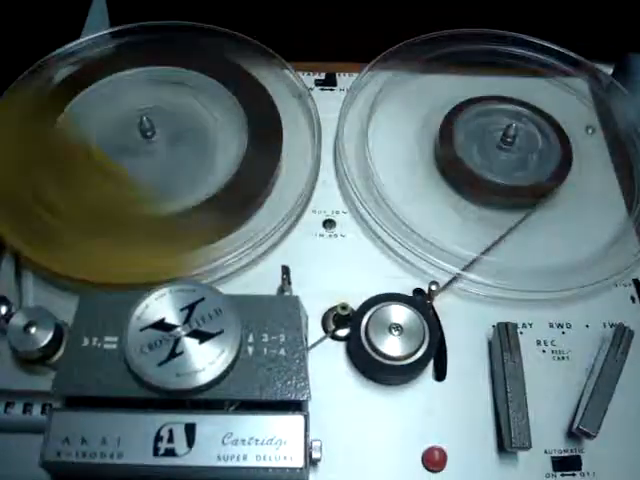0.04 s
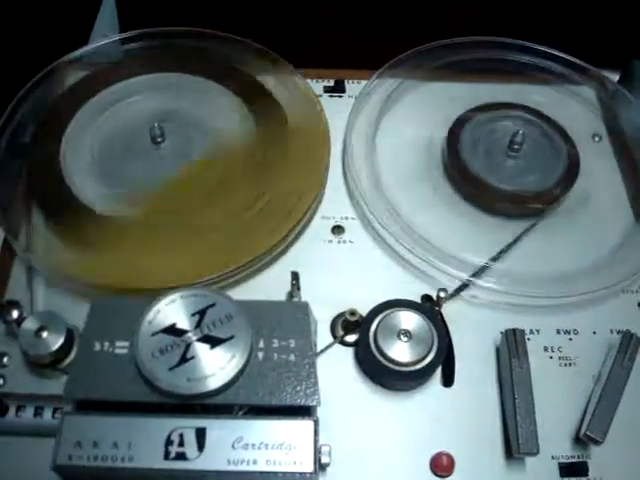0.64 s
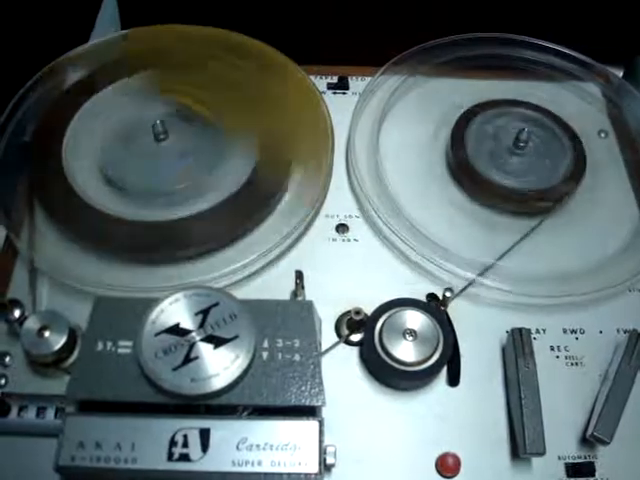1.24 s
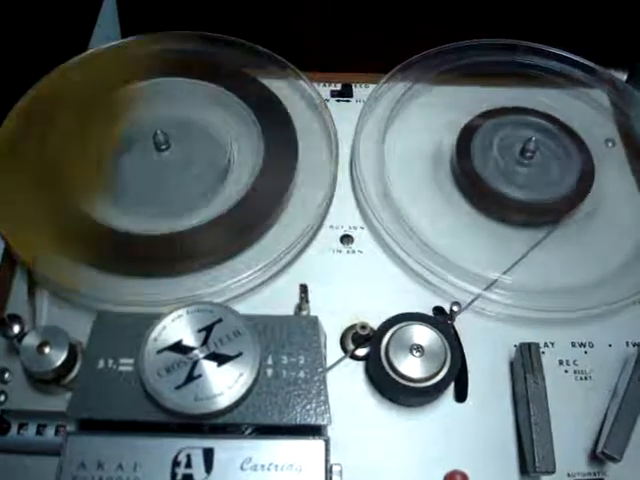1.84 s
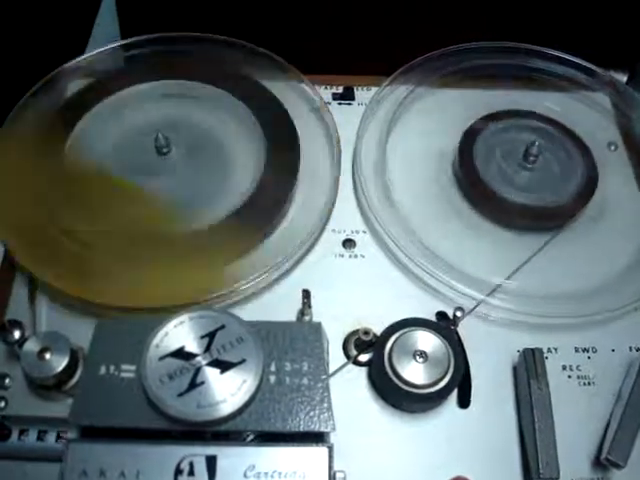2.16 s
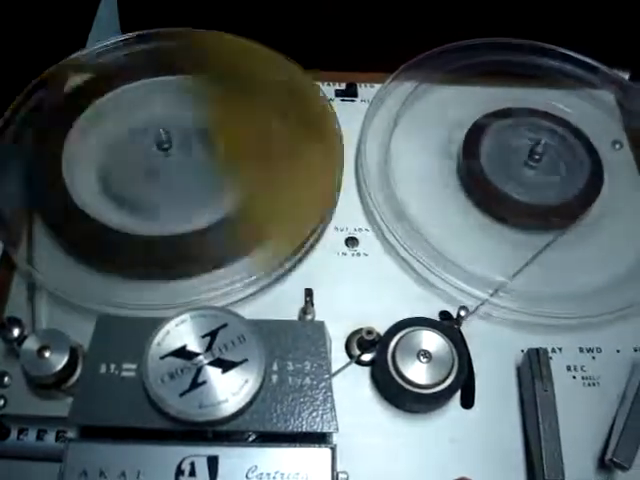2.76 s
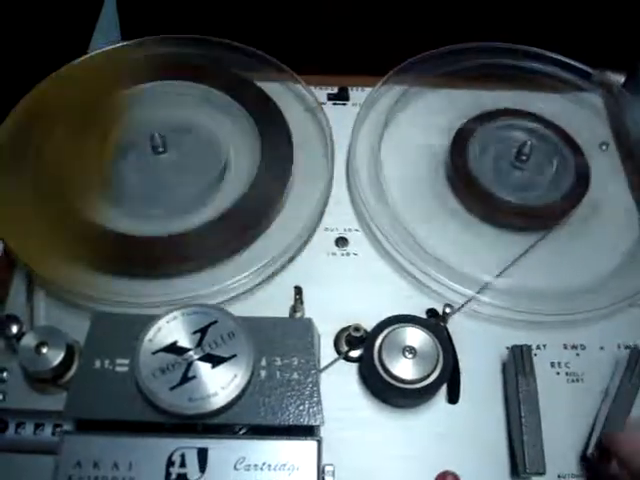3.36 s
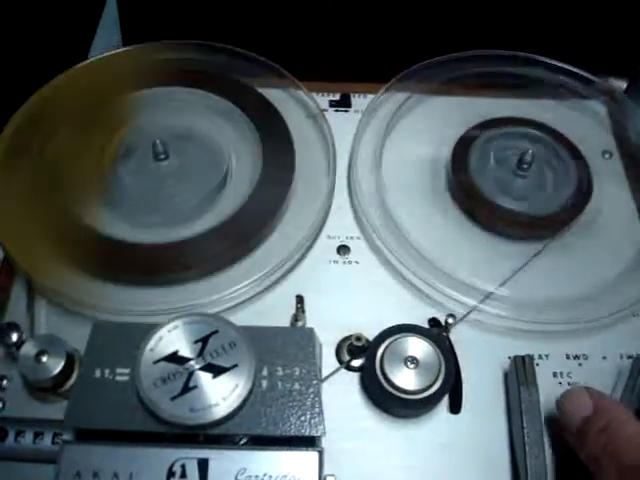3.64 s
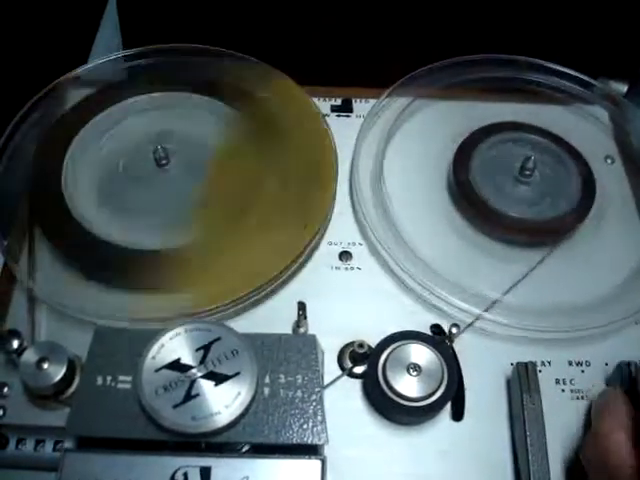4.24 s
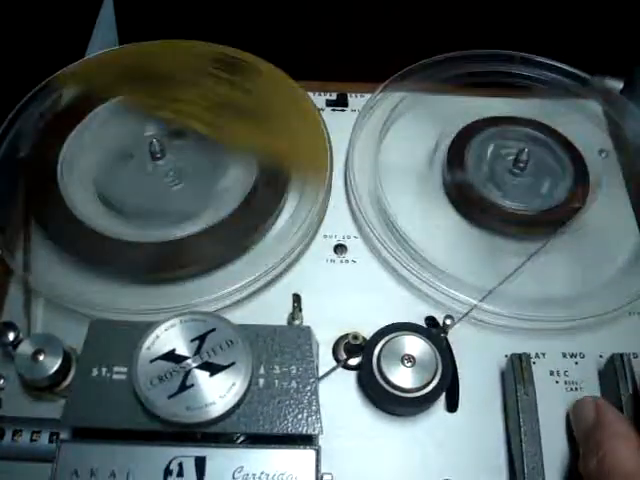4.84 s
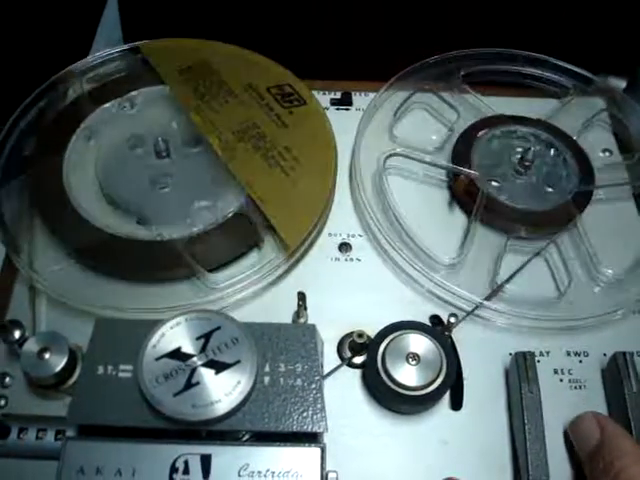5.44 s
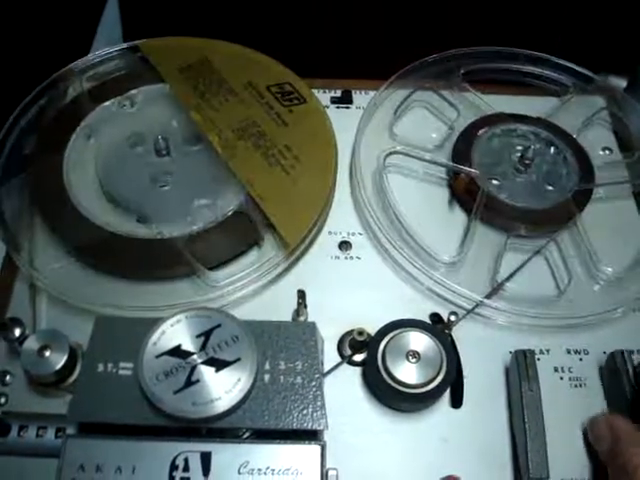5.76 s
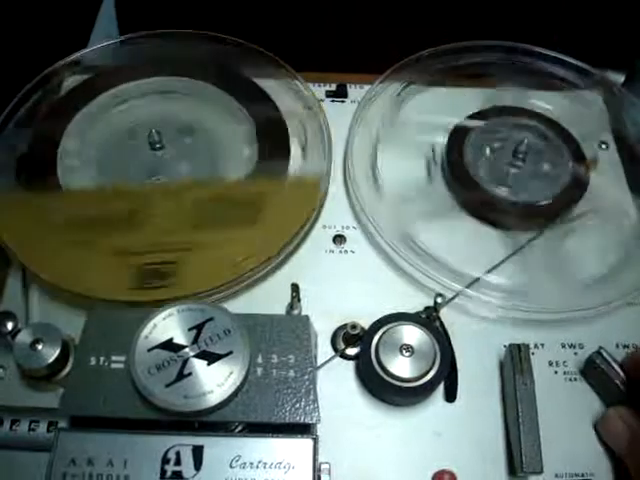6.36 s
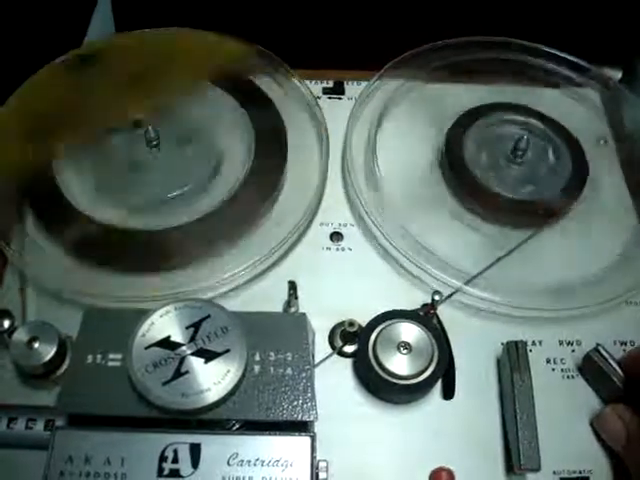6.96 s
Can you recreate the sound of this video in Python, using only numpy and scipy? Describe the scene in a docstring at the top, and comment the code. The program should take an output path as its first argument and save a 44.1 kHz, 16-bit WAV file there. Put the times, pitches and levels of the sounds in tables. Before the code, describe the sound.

A reel-to-reel tape deck is heard up close, winding fast from the start. Its motor hums steadily under a dense whir and a light tape hiss, and a rubbing reel gives short, high squeaks at uneven intervals. At about 4.3 seconds a lever makes a sharp metallic clunk. The hiss fades and the reels slow with a fluttering whine that falls in pitch, joined from about 4.7 to 5.5 seconds by scraping, short chirps and a few light knocks. The reels come to rest around 5.5 seconds, with a few more squeaks just after, while the motor keeps humming and whirring. The lever clunks again at about 5.9 and 6.1 seconds. The hum dips as the reels start up with a rough, rising growl and whine, with small knocks, chirps and a brush of tape, still gathering speed at 7 seconds.

```python
"""Tape deck winding, stopping and restarting

A reel-to-reel deck winds fast: its motor hums, the drive whirs, tape hisses and a rubbing reel squeaks.
A lever clunks, and friction runs the reels down with a falling, rattling whine as the motor keeps going.
The lever clunks again; the motor takes up the load and the reels growl back up towards full speed."""
import sys
import numpy as np
from scipy import signal
from scipy.fft import rfft, irfft, next_fast_len
from scipy.io import wavfile

SR = 44100
rng = np.random.default_rng(int(sys.argv[2]) if len(sys.argv) > 2 else 0)


def unload_audio(sound):
    """Save the sound as a 16-bit wav file, at the path given as the first command line argument."""
    columns = np.transpose(np.atleast_2d(sound))
    # keep every value between -1 and 1, then stretch to whole-number steps
    steps = np.round(np.clip(columns, -1, 1) * 32767)
    wavfile.write(sys.argv[1], SR, steps.astype(np.int16))


N = 308259
TIME = np.arange(N) / SR
RELEASE_S, ENGAGE_S = 4.36, 6.08  # the lever frees the drive, then engages it again
MAINS_HZ, FULL_WHINE_HZ = 59.9, 3135


def reel_speed(friction_hz_per_s=2330, drag_per_s=0.245, spin_up_s=1.97):
    """Share of full speed: steady, slowed to rest by dry friction and drag, then pulled up again."""
    friction = friction_hz_per_s / drag_per_s / FULL_WHINE_HZ
    slowing = (1 + friction) * np.exp(-drag_per_s * np.maximum(TIME - RELEASE_S, 0)) - friction
    rising = 1 - np.exp(-np.maximum(TIME - ENGAGE_S, 0) / spin_up_s)
    return np.maximum(slowing, 0) + rising


# Resonances of the reels and their mounts: centre_hz, width_hz, lift_db
REEL_MODES = [(285, 100, 5.5), (520, 110, 4), (590, 80, 4.5), (1125, 90, 5), (1314, 60, 4), (1540, 90, 4),
              (1925, 90, 6.5), (2080, 110, 7.5), (2238, 74, 17.5), (2345, 32, 8.5), (2385, 28, 7.5),
              (2450, 84, 18.5), (2650, 85, 9.5), (3480, 160, 9), (3740, 170, 18.5), (4080, 110, 7),
              (4232, 90, 16), (4462, 90, 12), (4720, 90, 10), (5010, 190, 14), (5850, 400, -5),
              (7060, 200, 10.5), (7400, 420, 16), (7950, 260, 12.5), (8850, 160, 11), (9750, 600, 14)]
def flare(hz):
    """Gain along a pitch curve: a partial flares as it glides through each reel resonance."""
    lift_db = sum(db / (1 + (2 * (hz - centre) / width) ** 4) for centre, width, db in REEL_MODES)
    return gain_of(lift_db)


# Partials of the reels' whine: harmonic, level_db
WHINE_PARTIALS = [(1, -37.5), (2, -46), (3, -54.5), (4, -60.5), (5, -64)]
def reel_whine(speed, driven, flutter=0.0066, driven_db=-5, driven_overtones_db=-12, dulling_db=-5):
    """The whine follows the speed; slow reels rasp, and driven reels sing less than braked ones."""
    pitch, size = FULL_WHINE_HZ * speed, len(speed)
    hz = pitch * (1 + flutter * wander(size, 109.5))
    slow = np.interp(hz, [850, 1700], [1, 0])
    rough = 0.3 + 0.4 * slow
    whine = np.zeros(size)
    for k, db in WHINE_PARTIALS:
        drive_db, slow_db = (driven_db, -4.5) if k == 1 else (driven_overtones_db, -3)
        level = gain_of(db + driven * drive_db + slow * slow_db)
        level *= gain_of(dulling_db * (k - 1) * (1 - speed))  # overtones fade as the reels slow
        level *= gain_of(np.minimum(4 * wander(size, 80), 2))  # each partial breaks off for moments
        whine += level * flare(k * pitch) * rough_tone(k * hz, rough, width_hz=120 * np.sqrt(k))
    slips = gain_of(-38.5 + driven * driven_db + 2 * wander(size, 70))  # uneven slips smear the whine
    rasp = slow * slips * rough_tone(hz, rough=0.99, width_hz=200)
    return whine + flare(pitch) * rasp, hz


def reels(speed, growl_db=-40, bite_s=0.17):
    """From the release on, the reels whine and chatter, with a growl two octaves below."""
    released = TIME >= RELEASE_S
    pitch, driven = FULL_WHINE_HZ * speed[released], TIME[released] > ENGAGE_S
    whine, fluttering_hz = reel_whine(speed[released], driven)
    growl = flare(pitch / 4) * rough_tone(fluttering_hz / 4, rough=0.27, width_hz=55)
    growl *= gain_of(growl_db - 0.5 * driven) * np.interp(pitch, [637, 700], [0, 1])
    growl *= np.where(driven, pitch / pitch[-1], 1) ** 1.3  # under drive it builds with the speed
    bite_db = np.interp(TIME[released] - RELEASE_S, [0, bite_s], [-4, 0])  # the brake takes hold
    chatter_db = wander(len(pitch), 45)
    turning = np.minimum(pitch / 300, 1)
    return RELEASE_S, (whine + growl) * turning * gain_of(bite_db + chatter_db)


# Tone colour of the struck mechanism: frequency_hz, level_db
METAL_COLOUR = [(30, -33), (100, -35), (200, -24), (300, -2), (420, -3), (650, 6), (1000, 5), (1600, 0.5),
                (2600, -2.5), (4600, -11), (6000, -20.5), (7500, -27), (10000, -30.5)]
# Its clear ringing modes: pitch_hz, level_db, t60_s
METAL_MODES = [(900, -18, 0.63), (1017, -1.5, 0.2), (1393, 1, 0.41), (1610, 1, 0.39), (1817, -28, 0.85),
               (2190, -15, 0.55)]
# Hits of the lever and its linkage: start_s, level_db, treble_tilt_db_per_octave, decay_factor
LEVER_CLUNKS = [(4.338, -13.5, 3, 0.21), (4.3534, -10.5, 4, 0.81), (4.356, -8.5, 7, 0.35),
                (4.3605, -16, 8, .2), (4.37, -13.5, 4, 1), (4.382, -15.5, 5.5, 0.88), (4.4008, -20, 4, .35),
                (5.9293, -21.5, 6, 0.23), (5.9355, -23.5, 5, 0.27), (5.946, -15, 11.5, 0.3),
                (5.949, -10, 12.5, 0.29), (5.966, -32, 9, 0.57), (6.075, -17, 12, 0.39),
                (6.077, -9.5, 9.5, 0.65), (6.086, -10.5, 9.5, 0.25), (6.094, -14.5, -1, 0.66),
                (6.102, -17, 0, 0.32), (6.11, -16, 10.5, 0.95), (6.1242, -22, 3, .45)]
def lever_clunk(start, db, tilt_db, decay_factor, crack_db=4, crack_s=0.00091, modes_db=-12):
    """A short crack, then the dense ring of springs and plates with a few clear modes."""
    t = np.arange(SR // 2) / SR
    noise = rng.standard_normal(len(t))
    dense = coloured(noise, lambda f: curve_db(METAL_COLOUR, f) + tilt_db * np.log2(np.fmax(f / 1e3, 1)))
    modes = np.zeros(len(t))
    for hz, mode_db, t60 in METAL_MODES:
        tone = np.sin(2 * np.pi * (hz * t + rng.random()))
        modes += gain_of(mode_db) * decay(t, t60 * decay_factor) * tone
    fade = decay(t, 0.2 * decay_factor)
    attack = 1 - np.exp(-t / 0.0006)
    crack = 1 + gain_of(crack_db) * np.exp(-t / crack_s)
    hit = dense * fade * crack + gain_of(modes_db) * modes * np.sqrt(fade)
    return start, gain_of(db) * attack * hit / 2


# Knocks of the loose reels at low speed: start_s, level_db, pitch_hz, t60_s
REEL_KNOCKS = [(4.997, -13.5, 252, 0.041), (5.098, -20, 280, 0.056), (5.29, -18, 564, 0.025),
               (5.329, -11.5, 523, 0.035), (5.355, -8, 460, 0.034), (5.366, -11, 520, 0.03),
               (6.326, -19, 418, 0.037), (6.358, -23, 420, 0.044), (6.571, -21, 850, 0.047),
               (6.62, -20, 770, .03), (6.699, -15, 960, 0.037), (6.879, -20, 1250, .035),
               (6.931, -19, 1150, .035), (6.767, -15, 1070, 0.033), (6.811, -19, 1120, .035),
               (6.834, -18, 1140, .04), (6.868, -20, 1140, .035), (6.954, -16, 1160, 0.035)]
# Light clacks of the lever's latch: start_s, level_db, pitch_hz, t60_s
LATCH_CLACKS = [(4.322, -5.5, 1260, 0.024), (4.3272, -6.5, 1080, 0.018), (4.3365, -3, 1160, 0.016),
                (4.36, -7, 1150, .014), (5.948, -10.5, 935, 0.028), (6.0955, -10.5, 800, .014)]
def knock(start, db, hz, t60, rise_s=0.0014, rattle=0.36, spread_octaves=0.39, cycles=5):
    """A damped knock: a few cycles of one pitch, with a rattle spread around it."""
    t = np.arange(SR // 4) / SR
    noise = rng.standard_normal(len(t))
    band = coloured(noise, lambda f: -10 * np.log10(1 + (np.log2((f + 1) / hz) / spread_octaves) ** 4))
    body = np.sin(2 * np.pi * hz * t) * np.exp(-hz * t / cycles) + rattle * band
    attack = 1 - np.exp(-t / rise_s)
    return start, gain_of(db) * body * attack * decay(t, t60)


# Chirps as the slow reels catch and slip:
# start_s, end_s, level_db, from_hz, to_hz, overtones_db, rough_share
SLIP_CHIRPS = [(4.912, 4.97, -35.5, 1660, 1400, -22, .3), (4.975, 5.03, -42, 4170, 3700, -30, .2),
               (4.985, 5.03, -31, 1380, 1240, -16, .2), (5.0, 5.035, -39.5, 670, 625, -1, .15),
               (5.04, 5.1, -40, 1190, 1080, 2, .15), (5.075, 5.175, -41, 1275, 1110, 0, .2),
               (5.088, 5.148, -29.5, 1110, 985, -24, .45), (5.145, 5.2, -33, 1400, 1150, -25, .15),
               (5.19, 5.243, -30, 810, 725, -10, .3), (5.205, 5.24, -34, 1590, 1460, -25, .15),
               (5.238, 5.278, -32, 665, 612, -3, .15), (5.385, 5.47, -33.5, 335, 255, -22, .6),
               (6.254, 6.295, -26, 292, 285, -20, .15), (6.39, 6.5, -31.5, 515, 565, -26, .5),
               (6.81, 6.89, -33.5, 1120, 1175, -22, .7), (6.915, 6.985, -32, 1090, 1165, -20, .7)]
def slip_chirp(start, end, db, from_hz, to_hz, overtones_db, rough, width_hz=160):
    """One slip slides in pitch; its overtones flare as they pass the reels' resonances."""
    size = round((end - start) * SR)
    pitch = np.geomspace(from_hz, to_hz, size)
    overtones = np.zeros(size)
    for k in range(2, 7):
        level = gain_of(-1.5 * (k - 2)) * flare(k * pitch) ** 0.63
        rolloff = 1 / (1 + (k * pitch / 4300) ** 12)
        overtones += level * rolloff * rough_tone(k * pitch, rough, width_hz)
    tone = rough_tone(pitch, rough, width_hz) + gain_of(overtones_db) * overtones / 2
    return start, gain_of(db) * tone * signal.windows.tukey(size, 0.5)


# Squeaks of a rubbing reel: start_s, end_s, level_db, pitch_hz
REEL_SQUEAKS = [(.052, .255, -37, 4829), (.72, 1.0, -46, 4785), (.785, 1.02, -45, 4875),
                (1.13, 1.21, -49.5, 4880), (1.29, 1.42, -46, 4875), (1.78, 1.93, -47.5, 4850),
                (2.06, 2.17, -48, 4880), (2.615, 2.71, -44.5, 4780), (2.735, 2.88, -44, 4780),
                (3.195, 3.3, -44, 4790), (3.315, 3.47, -38, 4780), (3.45, 3.53, -47, 4775),
                (3.705, 3.79, -38, 4835), (3.81, 3.94, -38, 4838), (4.25, 4.39, -38, 4810),
                (5.085, 5.215, -45, 4885), (5.235, 5.29, -39, 4885), (5.26, 5.36, -37.5, 4810),
                (5.345, 5.43, -40.5, 4795), (5.598, 5.68, -35.5, 4825), (5.66, 5.74, -36.5, 4818),
                (5.745, 5.82, -44, 4825)]
def reel_squeak(start, end, db, hz, upper_db=-20, attack_s=0.035, fade_db=-10):
    """A rub sets two high modes whistling: a quick rise, then a stuttering fade."""
    t = np.arange(round((end - start) * SR)) / SR
    pitch = hz * (1 + 0.0008 * wander(len(t), 30))
    lower = rough_tone(pitch, rough=0.11, width_hz=75)
    upper = rough_tone(1.72 * pitch, rough=1, width_hz=110)
    stutter_db = 1.5 * wander(len(t), 40)
    fade = gain_of(fade_db * (t / t[-1]) ** 1.3)
    envelope = np.minimum(t / attack_s, 1) * fade * signal.windows.tukey(len(t), 0.2)
    return start, gain_of(db + stutter_db) * (lower + gain_of(upper_db) * upper) * envelope


# Tone colour of the slipping drive: frequency_hz, level_db
SCRAPE_COLOUR = [(230, -27), (280, 14), (360, -8), (800, -1.5), (1100, 2.5), (1650, 2.5), (2100, -0.5),
                 (2400, 2), (2750, -32), (6000, -25)]
# Stretches where it slips: start_s, end_s, level_db
DRIVE_SLIPS = [(4.684, 5.62, -37), (6.735, 7.25, -39.5)]
def drive_scrape(grain_db=4, grain_hz=150):
    """The drive slips in uneven jerks and scrapes while the reels change speed."""
    jerks = rng.standard_normal(N) * gain_of(grain_db * wander(N, grain_hz))
    slipping = sum(gain_of(db) * swell(start, end, edges=0.45) for start, end, db in DRIVE_SLIPS)
    return slipping * coloured(jerks, lambda f: curve_db(SCRAPE_COLOUR, f))


# Strain on the motor as the drive lets go and as it grips: start_s, load_share, rise_s, ease_s
MOTOR_LOADS = [(4.4, 0.62, 0.13, 0.24), (6.08, 0.91, 0.021, 1)]
def motor_load():
    """Load on the motor, 0-1: it jumps at each change of drive and then eases."""
    load = np.zeros(N)
    for start, share, rise_s, ease_s in MOTOR_LOADS:
        t = np.maximum(TIME - start, 0)
        load += share * np.minimum(t / rise_s, 1) * np.exp(-t / ease_s)
    return load


# Mains hum of the motor and chassis: harmonic, level_db
HUM_PARTIALS = [(2, -62), (3, -76.5), (4, -53), (6, -35.5), (8, -47), (10, -50), (12, -45.5), (14, -46.5),
                (18, -56.5), (20, -55), (22, -50), (26, -55)]
def motor_hum(load, trim_db=1, load_db=-7.5, beat_s=2.51, crest_s=1.28):
    """The motor's field shakes the chassis at multiples of the mains, less under load."""
    beat = np.cos(2 * np.pi * (TIME - crest_s) / beat_s)
    hum = np.zeros(N)
    for k, db in HUM_PARTIALS:
        depth = 0.65 if k == 4 else 0.033  # only the fourth harmonic beats deeply
        tremble = 0.018 * (k / 6) ** 2
        tone = rough_tone(np.full(N, k * MAINS_HZ), rough=tremble, width_hz=7.3)
        hum += gain_of(db) * tone * np.sqrt(1 + depth ** 2 + 2 * depth * beat)
    return hum * gain_of(trim_db + load_db * load)


# Tone colour of the whir: frequency_hz, level_db
WHIR_COLOUR = [(18, -74.5), (30, -41), (117, -30), (205, -25), (231, -22), (325, -17), (358, 0),
               (385, -11.5), (468, -11), (673, -13.5), (742, -12), (901, -14.5), (1180, -12), (4940, -28),
               (10000, -46), (13000, -82), (22000, -120)]
# Resonances of the deck's plate and case: centre_hz, width_hz, lift_db
CASE_MODES = [(177, 21, 5), (210, 24, -0.5), (298, 79, 9), (356.4, 38, -12), (472, 22, 4), (549, 38, 7.5),
              (611, 35, 5.5), (650, 32, -1.5), (759, 60, 5), (940, 100, -2.5), (1010, 35, 3.5),
              (1150, 25, 1), (1300, 15, 0.5), (1665, 61, 3.5), (1928, 144, 4), (2386, 116, 4.5),
              (2700, 78, 4), (2950, 100, 4), (3135, 55, 4), (3540, 46, 2), (3700, 25, 2.5), (4040, 40, 1),
              (8960, 730, 8)]
def drive_whir(speed, load, level_db=-32, rest_db=-0.73, load_db=-3):
    """Fan and bearings: tiny dense impacts ring the case, softer with reels at rest or under load."""
    def colour_db(f):
        case_db = sum(db / (1 + (2 * (f - hz) / width) ** 2) for hz, width, db in CASE_MODES)
        return curve_db(WHIR_COLOUR, f) + case_db
    impacts = rng.standard_normal(N) * gain_of(0.5 * wander(N, 900))
    impacts *= 1 + 0.066 * np.cos(2 * np.pi * 2 * MAINS_HZ * TIME)  # torque pulses twice a mains cycle
    impacts *= gain_of(0.54 * wander(N, 30))  # slight flutter
    return coloured(impacts, colour_db) * gain_of(level_db + rest_db * (1 - speed) + load_db * load)


# Narrow resonances in the whir: centre_hz, width_hz, level_db
WHIR_BANDS = [(502, 45, -47), (549.6, 16, -48), (762, 22, -49.5), (1181, 26, -49.5), (2715, 22, -55),
              (3730, 18, -56.5), (4046, 26, -57.5)]
def wavering_whir(speed, drift=0.012, waver_db=2, waver_hz=2.2):
    """Narrow resonances in the whir slowly swell and drift in pitch; they fade as the reels slow."""
    bands = np.zeros(N)
    for hz, width_hz, db in WHIR_BANDS:
        level = gain_of(db + waver_db * wander(N, waver_hz))
        pitch = hz * (1 + drift * wander(N, waver_hz))
        bands += level * rough_tone(pitch, rough=1, width_hz=width_hz)
    return bands * speed


# Tone colour of the running tape: frequency_hz, level_db
HISS_COLOUR = [(500, 1.5), (2000, -3), (3300, 3.5), (4500, 0), (6000, -3), (8000, -6), (10000, -10.5)]
# The tape's brush against a reel flange: start_s, end_s, level_db
FLANGE_BRUSH = (6.68, 6.94, -37.5)
def tape_hiss(speed, level_db=-43, grain_db=3, flutter_db=1.5):
    """Tape slides over its guides, louder with speed, and once brushes a reel flange."""
    grains = rng.standard_normal(N) * gain_of(grain_db * wander(N, 270) + flutter_db * wander(N, 16))
    start, end, brush_db = FLANGE_BRUSH
    sliding = gain_of(level_db) * speed ** 0.41
    brushing = gain_of(brush_db) * swell(start, end, edges=0.7)
    return coloured(grains, lambda f: curve_db(HISS_COLOUR, f)) * np.hypot(sliding, brushing)


def reflections(x, wet_db=-11, t60=0.09, taps_per_s=2000, first_s=0.002):
    """Close reflections from the deck's plate and the walls make a gliding tone flutter."""
    t = np.arange(SR // 4) / SR
    taps = rng.standard_normal(len(t)) * (rng.random(len(t)) < taps_per_s / SR)
    taps *= (t > first_s) * decay(t, t60)
    return x + gain_of(wet_db) * signal.oaconvolve(x, taps / np.linalg.norm(taps))[:N]


def gain_of(db):
    """Decibels to amplitude."""
    return 10 ** (np.asarray(db) / 20)


def decay(t, t60):
    """A fade of 60 dB every t60 seconds."""
    return gain_of(-60 * t / t60)


def unit_rms(x):
    """Scales to an rms of 1."""
    return x / np.sqrt(np.mean(x ** 2) + 1e-20)


def curve_db(points, hz):
    """An EQ curve: points joined by straight lines over log frequency."""
    f, db = np.transpose(points)
    return np.interp(np.log(hz + 1), np.log(f + 1), db)


def coloured(x, shape_db):
    """Filters x by a dB curve over frequency and scales it to an rms of 1."""
    gain = gain_of(shape_db(np.fft.rfftfreq(len(x), 1 / SR)))
    return unit_rms(irfft(rfft(x) * gain, len(x)))


def wander(size, hz):
    """Smooth random motion of rms near 1, no faster than about hz."""
    step = int(np.clip(SR / hz / 20, 1, 200))
    count = next_fast_len(max(size, SR) // step + 2)
    f = np.fft.rfftfreq(count, step / SR)
    spectrum = rfft(rng.standard_normal(count)) * np.exp(-(f / hz) ** 2)
    return np.interp(np.arange(size) / step, np.arange(count), unit_rms(irfft(spectrum, count)))


def rough_tone(hz, rough, width_hz):
    """A tone on a pitch curve; the rough share of its power is smeared into a narrow band."""
    smear = (wander(len(hz), width_hz) + 1j * wander(len(hz), width_hz)) / np.sqrt(2)
    carrier = np.exp(2j * np.pi * (np.cumsum(hz) / SR + rng.random()))
    return np.sqrt(2) * (carrier * (np.sqrt(1 - rough) + np.sqrt(rough) * smear)).real


def swell(start, end, edges):
    """A smooth rise, hold and fall; edges is the share of time spent rising and falling."""
    inside = np.minimum(TIME - start, end - TIME) / (edges * (end - start) / 2)
    return np.sin(np.pi / 2 * np.clip(inside, 0, 1)) ** 2


def add(mix, start_s, sound):
    """Mixes a sound in at its start time."""
    part = mix[round(start_s * SR):][:len(sound)]
    part += sound[:len(part)]


def scene(low_cut_hz=180):
    """The whole deck in mono, heard from close by."""
    speed, load = reel_speed(), motor_load()
    transport = tape_hiss(speed) + wavering_whir(speed) + drive_scrape()
    add(transport, *reels(speed))
    for row in SLIP_CHIRPS:
        add(transport, *slip_chirp(*row))
    for row in REEL_KNOCKS + LATCH_CLACKS:
        add(transport, *knock(*row))
    low_cut = signal.butter(4, low_cut_hz, "high", fs=SR, output="sos")
    transport = signal.sosfilt(low_cut, transport)  # small parts radiate little bass
    deck = motor_hum(load) + drive_whir(speed, load) + reflections(transport)
    for row in REEL_SQUEAKS:
        add(deck, *reel_squeak(*row))
    for row in LEVER_CLUNKS:
        add(deck, *lever_clunk(*row))
    return deck[None]


def record(dry):
    """A steep low-pass takes off the highest treble."""
    low_pass = signal.firwin(801, cutoff=10150, window=("kaiser", 9), fs=SR)
    return signal.oaconvolve(dry, low_pass[None], "same")


dry = scene()
out = record(dry)
unload_audio(out)
```